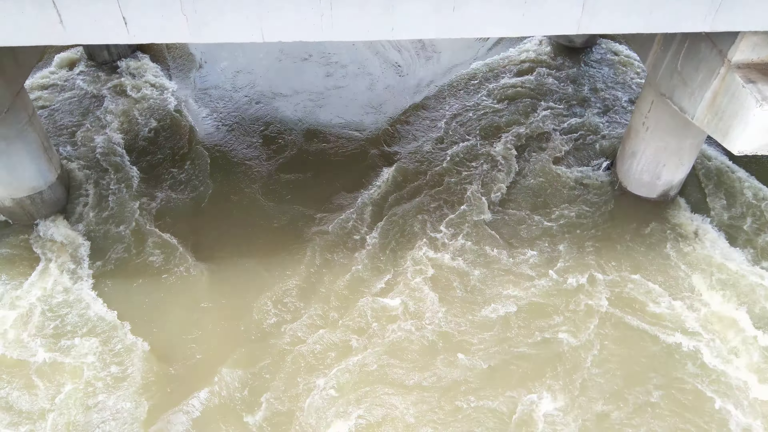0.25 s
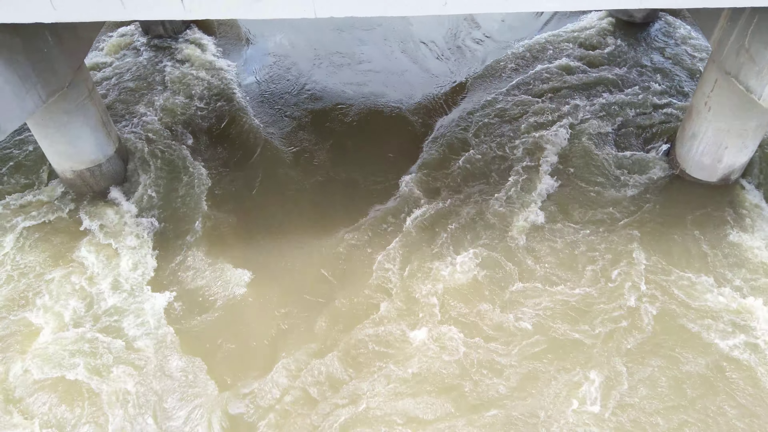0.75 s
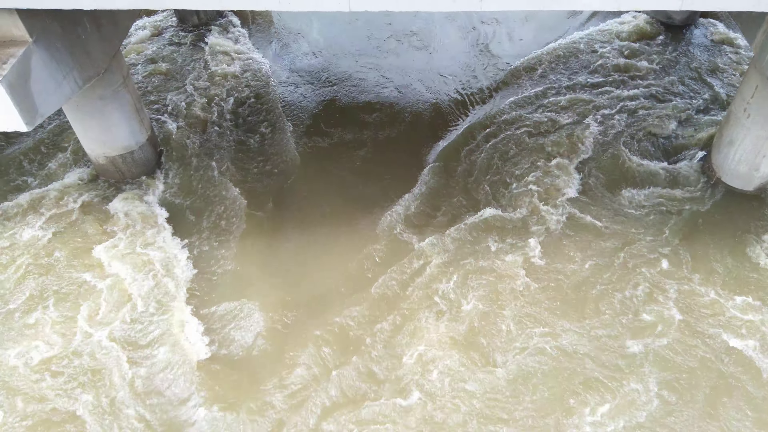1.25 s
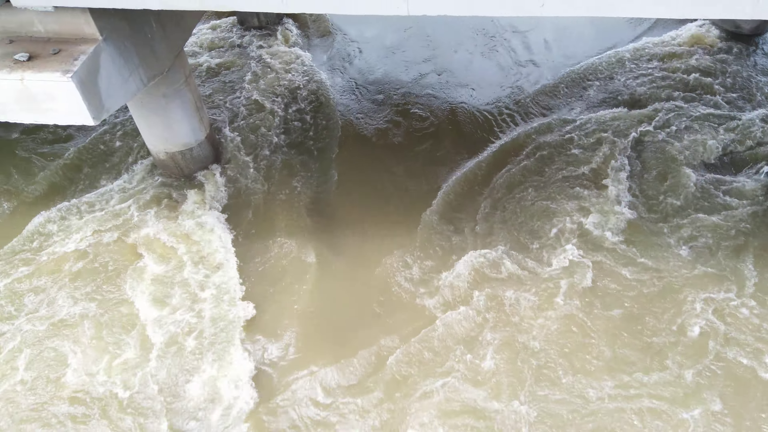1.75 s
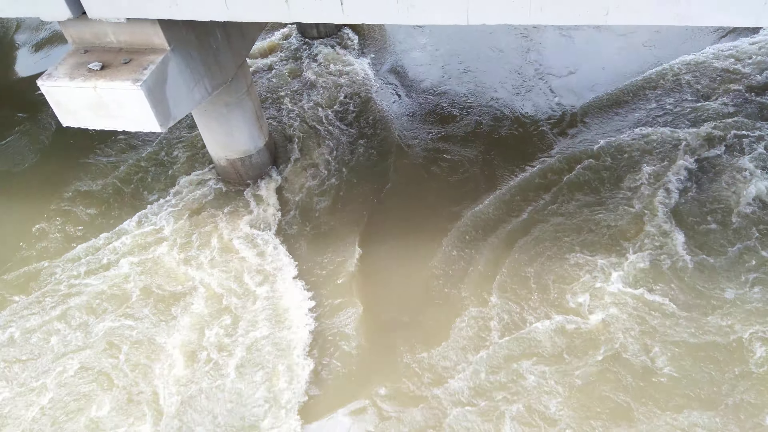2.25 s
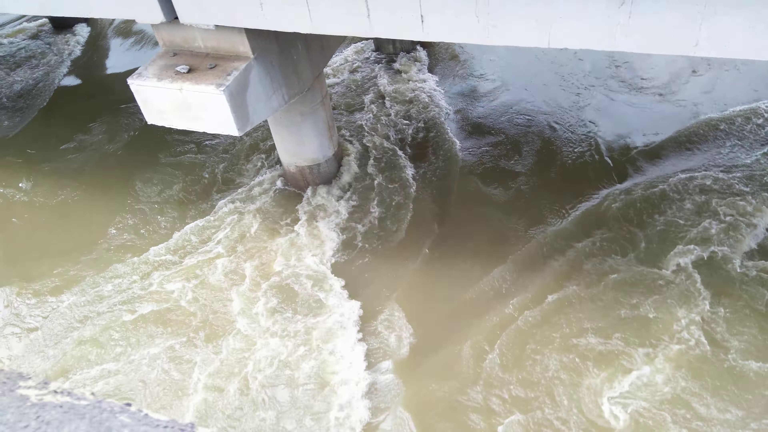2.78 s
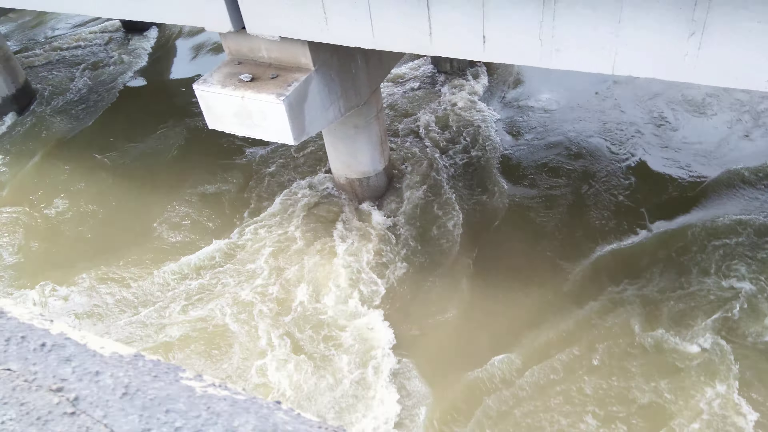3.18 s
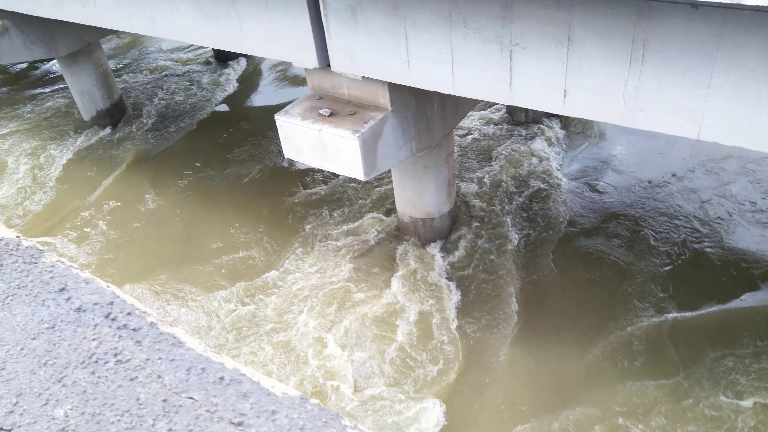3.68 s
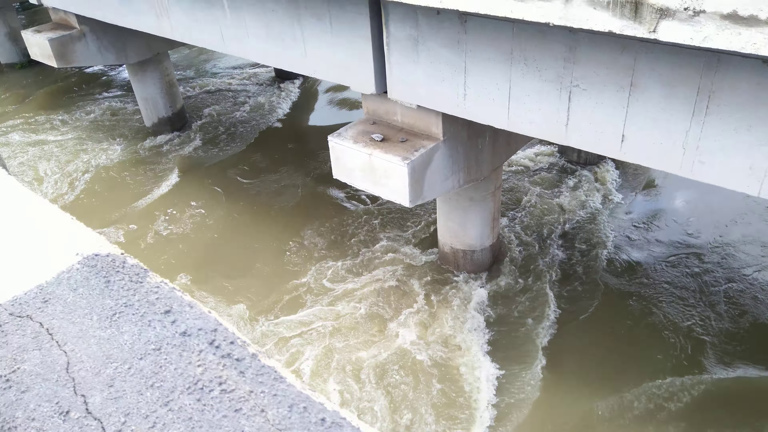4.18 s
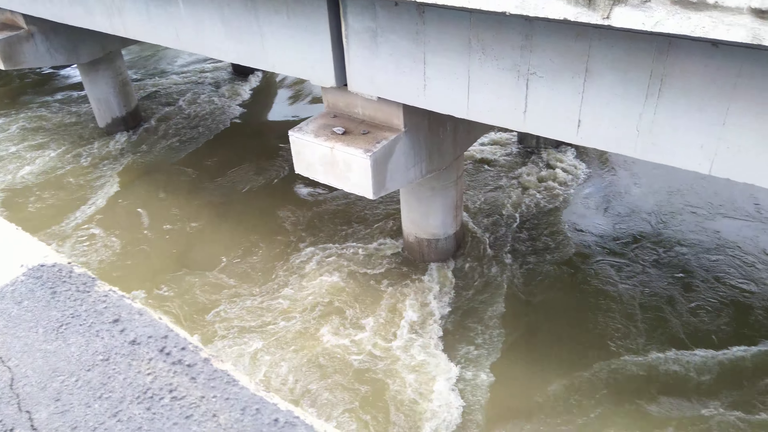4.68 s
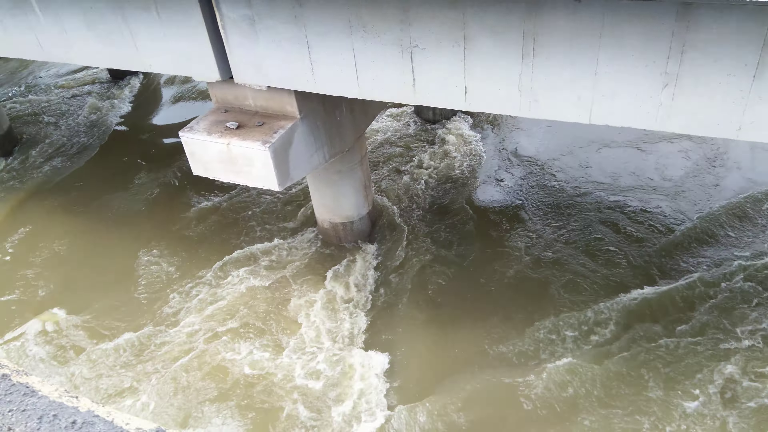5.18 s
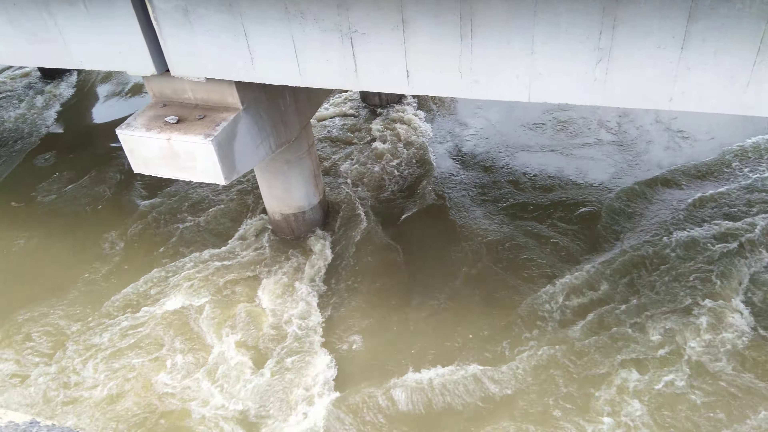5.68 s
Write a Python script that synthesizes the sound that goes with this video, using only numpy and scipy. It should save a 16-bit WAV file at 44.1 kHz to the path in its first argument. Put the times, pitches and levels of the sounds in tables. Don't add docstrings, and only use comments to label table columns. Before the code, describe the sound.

Floodwater tears past bridge piers in a broad, hissing, bubbling rush with hollow churn swelling under the deck. Deep wind buffets press on the small mono-like handheld microphone, pumping the roar down for instants. Light hard rattles come early as the hand moves. Near the end a faint airy moan passes, followed by two brief spray splashes over the unbroken roar.

```python
import sys
import numpy as np
from scipy import signal
from scipy.fft import rfft, irfft
from scipy.io import wavfile
from scipy.ndimage import uniform_filter1d

SR = 44100
rng = np.random.default_rng(int(sys.argv[2]) if len(sys.argv) > 2 else 0)


def magnitude_from_level(level_db):
    exponent = np.asarray(level_db, float) / 20
    return 10 ** exponent


def wrap_up_sound(samples):
    columns = np.atleast_2d(samples).T
    tamed = np.clip(columns, -1, 1)
    steps = np.round(tamed * 32767).astype(np.int16)
    wavfile.write(sys.argv[1], SR, steps)


N = 261513

# f/Hz, width/Hz, level/dB
MOAN_BANDS = [(444, 21, -2.5), (638, 23, -4), (1728, 55, -11)]
MOAN_START_S, MOAN_LENGTH_S, MOAN_DB = 5.16, .29, -23

# t/s, low f/Hz, high f/Hz, level/dB
HISS_SPLITS = [(.33, 4150, 5200, -36), (1.955, 6250, 7700, -36), (3.19, 6250, 7700, -39),
               (3.559, 6300, 7700, -37), (3.72, 5650, 6900, -33), (3.745, 5150, 6350, -36),
               (3.745, 6900, 8300, -41), (3.86, 6900, 8300, -38), (5.305, 6860, 8300, -39)]

# f/Hz, width/Hz, level/dB
FITTING_MODES = [(2270, 60, -6), (2990, 45, -2), (3750, 60, -6), (4720, 50, -2), (5100, 120, -7),
                 (5720, 120, -6), (6560, 45, -6), (6970, 45, -10), (7445, 22, -9), (7745, 30, -13)]
# t/s, level/dB, length/s, brightness/(dB/octave), tick over ringing/dB
RATTLES = [
    (0.086, -21.5, 0.037, 2, -3),
    (0.157, -28, 0.026, 6, 15),
    (0.181, -28.5, 0.036, 1, 8),
    (0.767, -28, 0.016, -4, 12),
    (1.131, -20, 0.02, -6, -6),
]

# t/s, depth/dB, fall/s, hold/s, recovery/s
DUCKS = [(0.68, 3.3, 0.01, 0.016, 0.016), (0.803, 8.7, 0.021, 0.024, 0.08),
         (1.151, 1.8, 0.012, 0.028, 0.015), (1.427, 3.8, 0.032, 0.002, 0.015),
         (1.466, 8.3, 0.008, 0.059, 0.057), (1.602, 6.6, 0.012, 0.002, 0.065),
         (1.712, 4.4, 0.014, 0.002, 0.147), (1.827, 3.4, 0.009, 0.047, 0.015),
         (2.062, 3.4, 0.004, 0.018, 0.019), (2.391, 5.0, 0.043, 0.046, 0.13),
         (2.657, 4.6, 0.009, 0.001, 0.057), (3.13, 4.0, 0.058, 0.018, 0.084),
         (3.883, 2.9, 0.004, 0.098, 0.017), (4.176, 8.3, 0.012, 0.002, 0.066),
         (4.509, 5.1, 0.014, 0.001, 0.042), (4.713, 2.3, 0.006, 0.015, 0.148),
         (4.813, 6.6, 0.013, 0.049, 0.024), (4.957, 3.5, 0.049, 0.003, 0.033)]

# f/Hz, density/dB
THUMP_COLOUR = [(20, -22.5), (40, -24.5), (60, 3.5), (95, 12), (130, 7), (180, -15.5), (300, -64.5)]
FLUTTER_COLOUR = [(60, -24), (120, -7.5), (160, 0), (230, -3.5), (290, -9), (380, -18.5), (700, -64)]
RUSH_COLOUR = [(180, -23), (270, 1.5), (340, 5.5), (450, -3), (560, -5), (800, -46)]
# centre f/Hz, level at breeze 0/dB, share of breeze, share of ducking
WIND_LAYERS = [
    (95, -18.5, 1.27, 0.3),
    (175, -19.5, 0.48, 0.21),
    (330, -25.5, .1, 0.35),
]
# t/s, level/dB
BREEZE = [(0, -1), (.6, -0.5), (1, 0), (1.5, 1), (1.9, 1), (2.2, -2), (2.5, 2.5), (2.9, -1.5), (3.3, -0.5),
          (3.7, -3.5), (3.95, 0), (4.3, -3.5), (4.5, -6), (5.0, -4.5), (5.5, -2), (5.93, -4.5)]
# t/s, swell/dB, centre f/Hz, length/s
BUFFETS = [(0.044, 2.5, 95, 0.048), (.11, 5.5, 175, 0.055), (.22, 3, 253, 0.062), (0.296, 4.5, 100, .08),
           (.49, 5, 330, 0.094), (.64, 5, 226.5, 0.12), (0.815, 7, 178, 0.041), (1.16, 3, 179, .08),
           (1.261, 4, 127, 0.043), (1.446, 8.5, 330, 0.12), (1.6, 5.5, 107, 0.094), (1.717, 4.5, 95, .08),
           (1.812, 9.5, 280, 0.053), (2.01, 4.5, 109, 0.12), (2.08, 4.5, 179, 0.045), (2.2, 8, 105, 0.076),
           (2.31, 4.5, 210, 0.13), (2.41, 7, 99, 0.054), (2.75, 5, 330, 0.13), (3.016, 2.5, 95, 0.068),
           (3.932, 3.5, 152, 0.14), (4.19, 9.5, 111, 0.028), (4.38, 1, 110, .05), (4.52, 11.5, 118, 0.044),
           (4.72, 7.5, 165, 0.055), (4.84, 11, 101, 0.086), (4.99, 5.5, 180, 0.047), (5.25, 4, 298, 0.24),
           (5.73, 5.5, 215, 0.064), (5.9, 6, 240, .06)]
REACH_OCTAVES, LUMPS_DB = .7, 1.67
EDDY_DB = -29.5

# t/s, level/dB, length/s, centre f/Hz, spread/octaves
SPLASHES = [
    (5.497, -32, 0.057, 2200, 0.44),
    (5.682, -22, 0.032, 3000, 0.162),
]

# f/Hz, density/dB
WHITEWATER_COLOUR = [(60, -31), (250, -5), (550, 5.5), (900, 2), (1800, -1), (3000, -3.5), (5000, -6.5),
                     (7300, -10.5), (7700, -16), (8000, -29.5), (8300, -38.5), (8600, -67)]
# f/Hz, width/Hz, level/dB
HOUSING = [(1214, 290, -4.5), (1810, 300, 2), (2350, 180, 0), (2850, 410, 2), (3350, 310, -1.5),
           (3910, 500, 1.5), (4640, 250, -1.5), (4740, 150, 2)]
# t/s, level/dB, tilt/(dB/octave), under-deck churn/dB
ROAR = [(0, -21, -0.3, -1.5), (.3, -22.5, 0.2, 2), (.6, -21.5, 0, 0.5), (1, -21, 0.5, 2.5),
        (1.4, -21.5, 0.6, 1.5), (1.7, -23, 0.9, 7.5), (2, -22, 0.05, -1.5), (2.35, -22, 1, 4.5),
        (2.9, -19.5, 0.25, 0.9), (3.3, -19.5, -0.04, -1.8), (3.9, -20.5, -0.1, -1), (4.45, -20, -0.1, -1),
        (4.75, -19.5, 0.76, 0.5), (5.25, -19.5, 2.3, 4.5), (5.5, -18, 0.7, -2), (5.93, -17.5, 0.9, -1.5)]
# t/s, dip and hump factor, treble scoop/dB, deck-face ridge/dB
SHADE = [(0, 1.1, 0.3, -2), (1, 1.1, 2, 0.6), (1.8, 1.4, 1.3, 0.5), (2.8, 1.4, 0.5, 0),
         (3.8, 1.1, 0.9, -0.3), (4.6, .9, 0, 0.5), (5.1, 0.95, -4, 1), (5.5, 0.92, -2.5, 1),
         (5.93, 0.81, -3.5, -0.7)]

EDGE_HZ = 8320


def evened(x):
    return x / np.sqrt(np.mean(x ** 2) + 1e-20)


def steadied(x, share=.42, size=1500):
    power = abs(uniform_filter1d(x ** 2, size))
    return evened(x / (power + .02) ** (share / 2))


def read(points, hz):
    f, value = np.transpose(points)
    return np.interp(np.log(hz + 1), np.log(f + 1), value)


def follow(rows, t):
    s, *columns = np.transpose(rows)
    return [np.interp(t, s, c) for c in columns]


def grid(size):
    frames = np.arange(N * 4 // size + 5)
    return np.fft.rfftfreq(size, 1 / SR)[:, None], frames * size / 4 / SR


def shaped(field_db, size):
    a, b = rng.standard_normal(field_db.shape[::-1] + (2,)).T
    spectra = (a + 1j * b) * magnitude_from_level(field_db)
    return evened(signal.istft(spectra, nperseg=size, noverlap=size * 3 // 4)[1][:N])


def patches(shape, tall, long):
    field = rng.standard_normal(shape[::-1]).T
    return evened(uniform_filter1d(uniform_filter1d(field, tall, axis=0), long, axis=1))


def water_colour(hz, depth=1):
    humps_db = sum(db * np.exp(-2 * ((hz - f) / width) ** 2) for f, width, db in HOUSING)
    return read(WHITEWATER_COLOUR, hz) + depth * humps_db


def moan():
    out, length = np.zeros(N), round(MOAN_LENGTH_S * SR)
    size = 16384
    hz = np.fft.rfftfreq(size, 1 / SR)
    colour = sum(magnitude_from_level(db) / (1 + ((hz - f) / width * 2) ** 2) for f, width, db in MOAN_BANDS)
    sound = steadied(evened(irfft(rfft(rng.standard_normal(size)) * colour)))
    fade = signal.windows.tukey(length, .5)
    out[round(MOAN_START_S * SR):][:length] = magnitude_from_level(MOAN_DB) * sound[:length] * fade
    return out


def splits():
    out, length = np.zeros(N), 1700
    hz = np.fft.rfftfreq(length, 1 / SR)
    hiss = rng.standard_normal((len(HISS_SPLITS), length))
    for (s, low_hz, high_hz, db), noise in zip(HISS_SPLITS, hiss):
        inside = (hz > low_hz) * (hz < high_hz)
        band = irfft(rfft(noise) * inside * magnitude_from_level(.6 * water_colour(hz)), length)
        burst = evened(band) * np.sqrt(2) * np.hanning(length)
        out[round(s * SR) - length // 2:][:length] += magnitude_from_level(db) * burst
    return out


def rattles():
    size = 4000
    out, knocks = np.zeros(N), rng.standard_normal((len(RATTLES), len(FITTING_MODES) + 1, size))
    t = np.arange(size) / SR
    hz, width_hz, mode_db = np.transpose(FITTING_MODES)[:, :, None]
    rings = np.sin(2 * np.pi * hz * t) * np.exp(-np.pi * width_hz * t)
    tick_band = signal.butter(6, [2600, 7100], "bandpass", fs=SR, output="sos")
    for (s, db, length, bright_db, tick_db), noise in zip(RATTLES, knocks):
        shaken = noise * np.sin(np.pi * np.clip(t / length, 0, 1)) ** .5
        modes = signal.fftconvolve(shaken[1:], rings, axes=1)[:, :size]
        modes /= np.linalg.norm(modes, axis=1, keepdims=True)
        modes *= magnitude_from_level(mode_db + bright_db * np.log2(hz / 4000))
        tick = signal.sosfilt(tick_band, shaken[0])
        sound = modes.sum(0) + magnitude_from_level(tick_db) * tick / np.linalg.norm(tick)
        rms = np.sqrt(np.mean(sound[t < length] ** 2))
        out[round(s * SR):][:size] += magnitude_from_level(db) * sound / rms
    return out


def duck_db(t):
    s, depth_db, fall, hold, recovery = np.transpose(DUCKS)[:, :, None]
    down = np.clip((t - s) / fall, 0, 1)
    back = np.exp(-np.maximum(t - s - fall - hold, 0) / recovery)
    return -np.sum(depth_db * down * back, axis=0)


def port_db(t, hz, level_db, breeze_share, duck_share):
    s, swell_db, centre_hz, length = np.transpose(BUFFETS)[:, :, None]
    near = np.exp(-(np.log2(centre_hz / hz) / REACH_OCTAVES) ** 2)
    buffets_db = np.sum(swell_db * near * np.exp(-(2 * (t - s) / length) ** 2), axis=0)
    lumps_db = LUMPS_DB * patches((1, len(t)), tall=1, long=60)[0]
    breeze_db = breeze_share * follow(BREEZE, t)[0]
    return level_db + breeze_db + buffets_db + lumps_db + duck_share * duck_db(t)


def wind():
    hz, t = grid(size=2048)
    coarse_s, fine_s = np.arange(0, N, 32) / SR, np.arange(N) / SR
    out = np.zeros(N)
    for layer, colour in zip(WIND_LAYERS, (THUMP_COLOUR, FLUTTER_COLOUR, RUSH_COLOUR)):
        noise = shaped(read(colour, hz) + 0 * t, size=2048)
        noise = steadied(steadied(noise, share=1.0, size=6000))
        out += magnitude_from_level(np.interp(fine_s, coarse_s, port_db(coarse_s, *layer))) * noise
    return out


def eddies():
    out = np.zeros(N + SR)
    for (s, swell_db, hz, length), phase in zip(BUFFETS, rng.random((len(BUFFETS), 1))):
        t = np.arange(-length, length, 1 / SR)
        turns = hz * t * (1 - .06 * t / length) + phase
        swing = np.sin(2 * np.pi * turns) * np.exp(-(2 * t / length) ** 2)
        start = round((s - length) * SR)
        skip = max(-start, 0)
        out[max(start, 0):][:len(t) - skip] += magnitude_from_level(EDDY_DB + swell_db) * swing[skip:]
    return out[:N]


def splashes():
    out, drops = np.zeros(N), rng.standard_normal((len(SPLASHES), 24, 3))
    for (s, db, length, hz, octaves), (pitch, size, phase) in zip(SPLASHES, drops.transpose(0, 2, 1)):
        t = np.arange(0, length, 1 / SR)
        drop_hz = np.minimum(hz * 2 ** (octaves * pitch), 7600)
        rings = np.sin(2 * np.pi * np.outer(drop_hz, t) + 9 * phase[:, None])
        cluster = evened(magnitude_from_level(4.7 * size) @ rings)
        out[round(s * SR):][:len(t)] += magnitude_from_level(db) * cluster * signal.windows.tukey(len(t), .5)
    return out


def bubbles(per_s=900, cycles=9, spread_db=1.5):
    size = magnitude_from_level(spread_db * np.minimum(rng.exponential(1, N), 4)) * (rng.random(N) < per_s / SR)
    kind, out = rng.integers(0, 30, N), np.zeros(N)
    for k, hz in enumerate(np.geomspace(350, 7200, 30)):
        turns = np.arange(0, 3 * cycles, hz / SR)
        envelope = turns * np.exp(-3 * turns / cycles)
        ring = np.sin(2 * np.pi * turns * (1 + 0.0034 * turns)) * envelope
        ring *= magnitude_from_level(water_colour(hz)) * np.sqrt(hz) / np.sqrt(np.sum(ring ** 2))
        out += signal.oaconvolve(size * (kind == k), ring)[:N]
    return evened(out)


def whitewater():
    hz, t = grid(size=512)
    _, tilt_db, churn_db = follow(ROAR, t)
    depth, scoop_db, ridge_db = follow(SHADE, t)
    field_db = water_colour(hz, depth) + tilt_db * np.log2((hz + 50) / 3000)
    field_db = field_db + scoop_db * np.exp(-2 * ((hz - 5000) / 2200) ** 2)
    field_db = field_db + ridge_db * np.exp(-2 * ((hz - 1700) / 550) ** 2)
    field_db = field_db + churn_db / (1 + (hz / 1100) ** 4)
    drift_db = 0.53 * patches(field_db.shape, tall=6, long=20)
    flicker_db = 0.42 * patches(field_db.shape, tall=60, long=5)
    return shaped(field_db + drift_db + flicker_db, size=512)


def scene():
    coarse_s, t = np.arange(0, N, 32) / SR, np.arange(N) / SR
    roar_db = follow(ROAR, t)[0] + np.interp(t, coarse_s, duck_db(coarse_s))
    water = magnitude_from_level(roar_db) * (magnitude_from_level(2.0) * whitewater() + magnitude_from_level(-12) * bubbles())
    air = wind() + eddies() + moan()
    return np.tile(water + splashes() + rattles() + air, (2, 1))


def roll_off(x):
    return signal.sosfilt(signal.butter(12, 8800, fs=SR, output="sos"), x)


def record(dry):
    ceiling = 1.15
    held = ceiling * np.tanh(dry / ceiling)
    lowpass = signal.firwin(1023, EDGE_HZ, window=("kaiser", 9), fs=SR)
    held = signal.oaconvolve(held, lowpass[None], "same")
    mix = held + splits() * np.array([[1], [-1]])
    return roll_off(mix)


dry = scene()
out = record(dry)
wrap_up_sound(out)
```